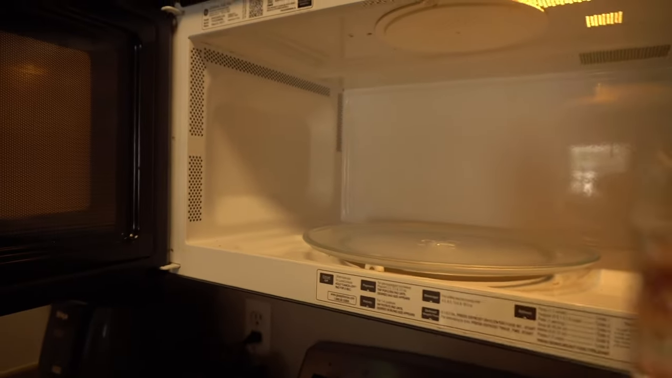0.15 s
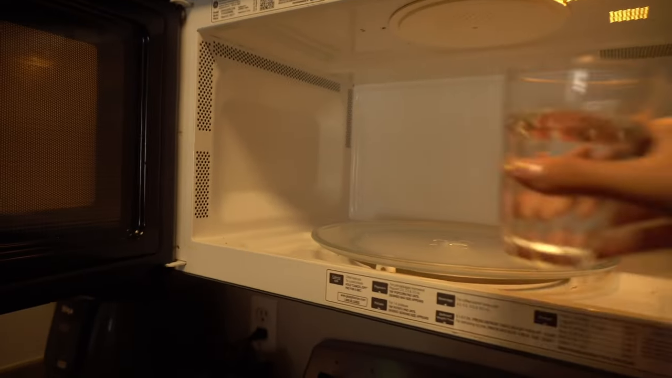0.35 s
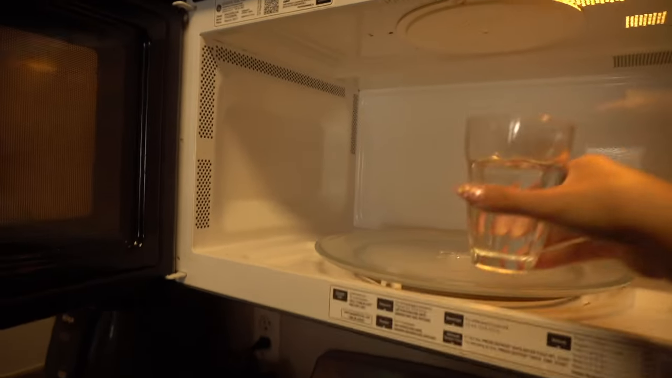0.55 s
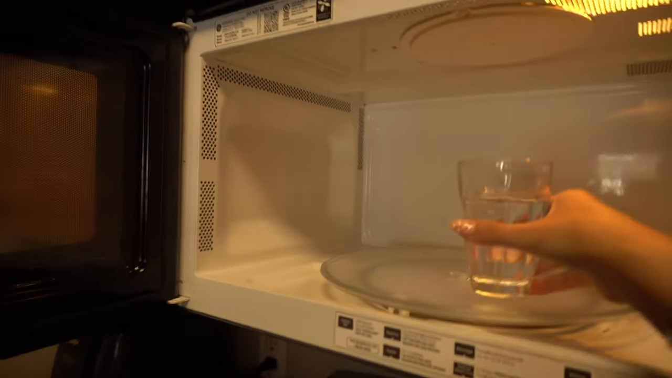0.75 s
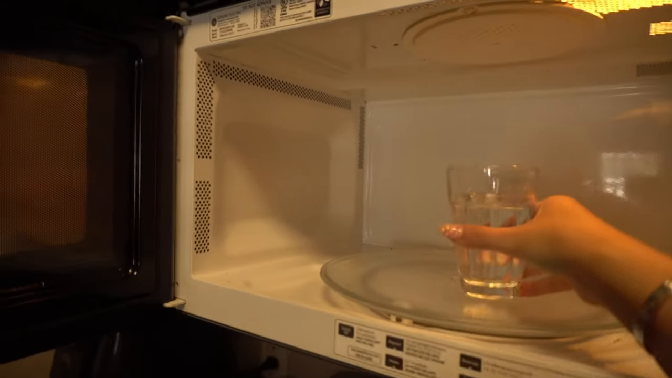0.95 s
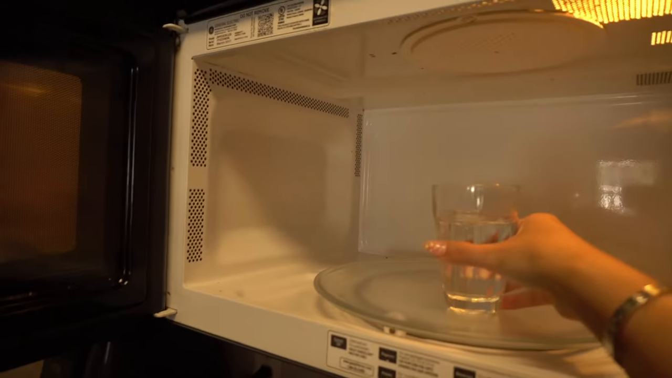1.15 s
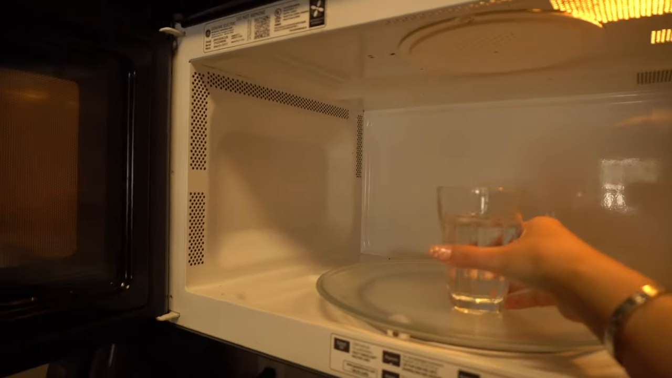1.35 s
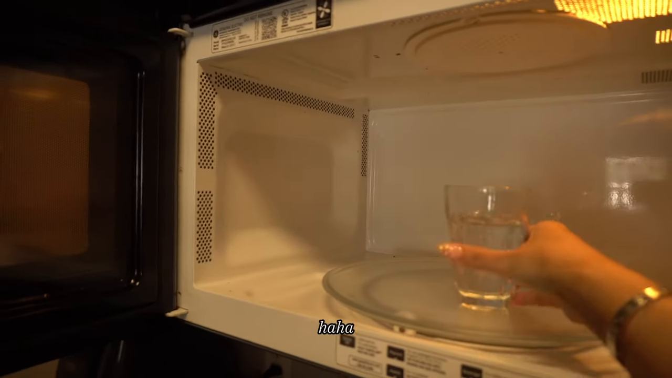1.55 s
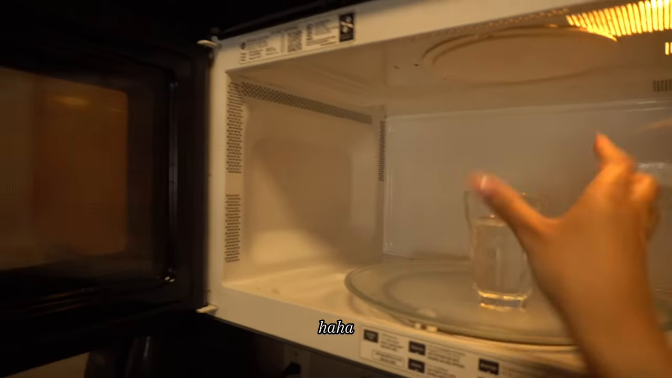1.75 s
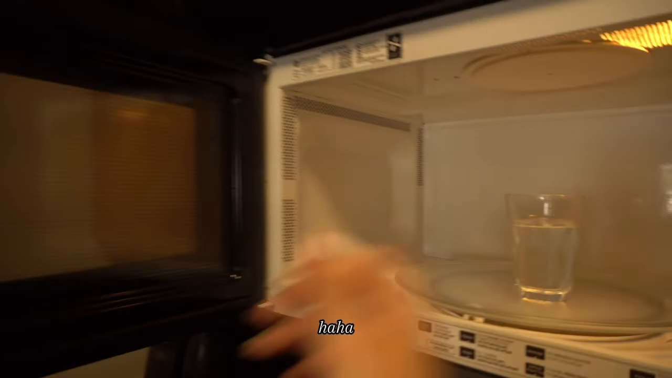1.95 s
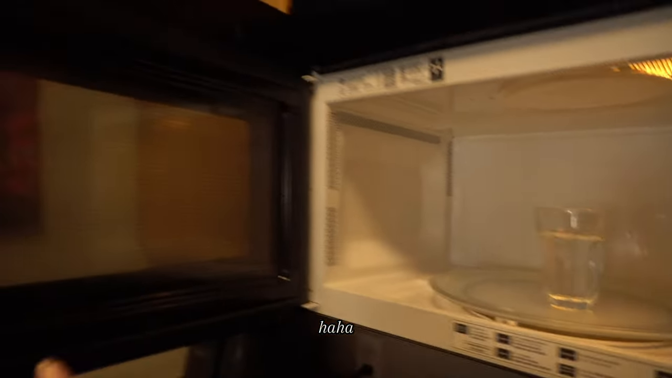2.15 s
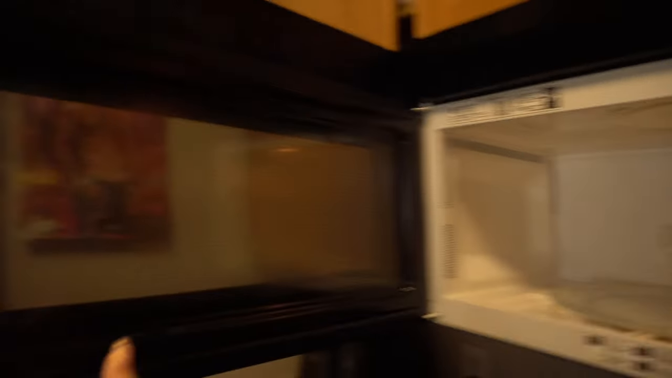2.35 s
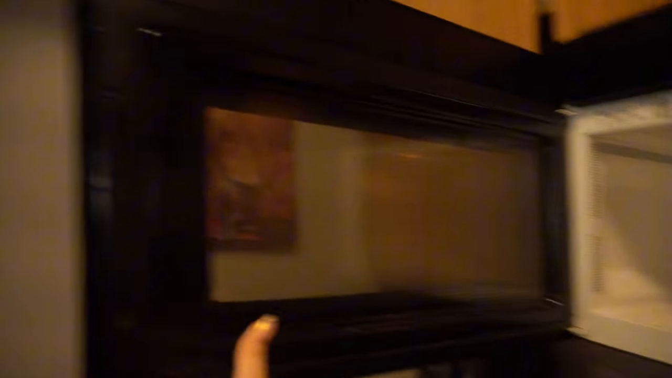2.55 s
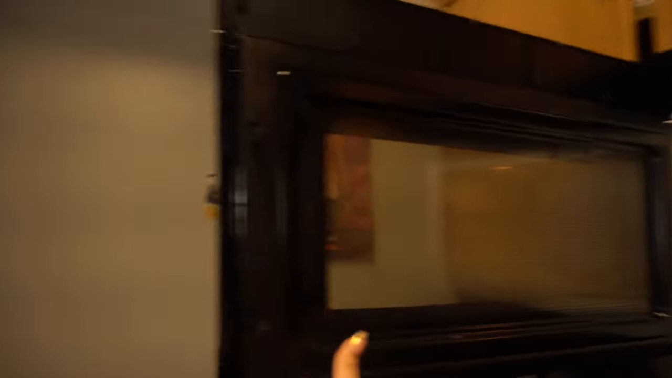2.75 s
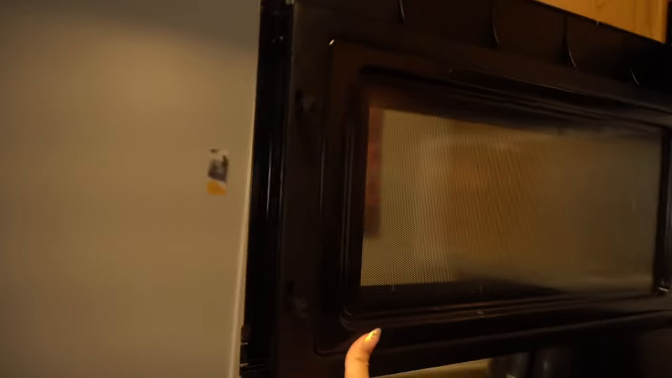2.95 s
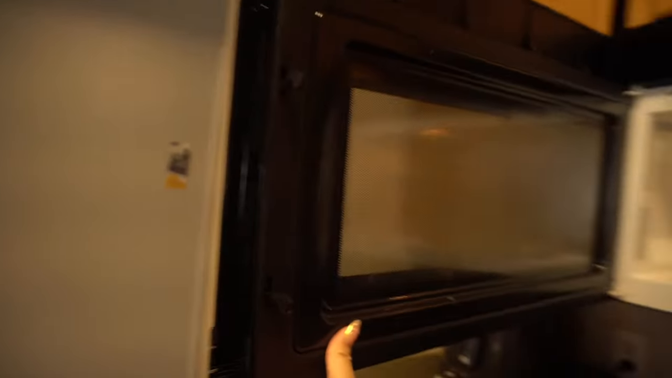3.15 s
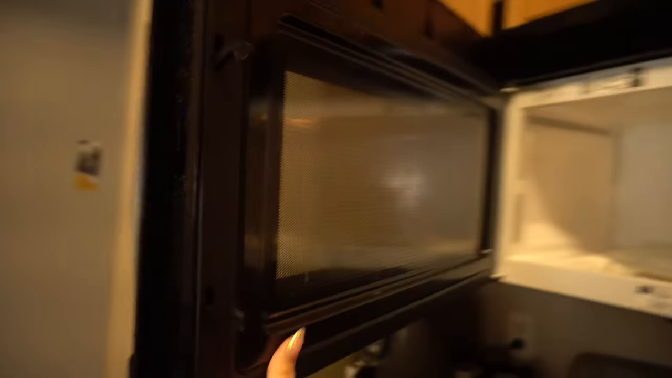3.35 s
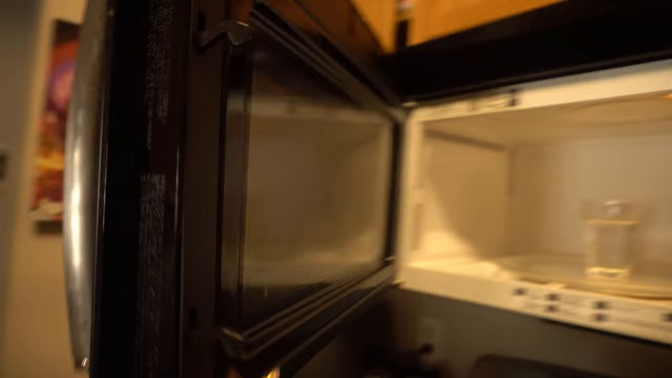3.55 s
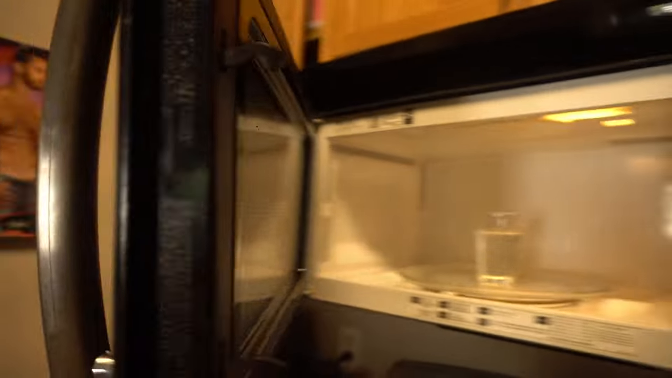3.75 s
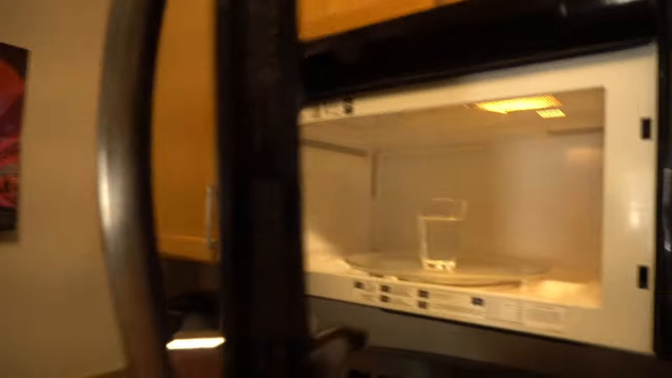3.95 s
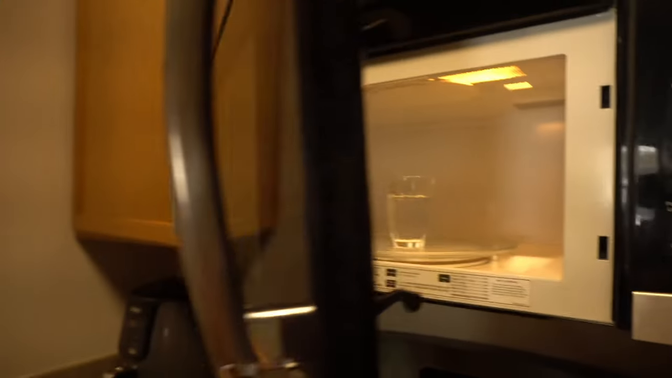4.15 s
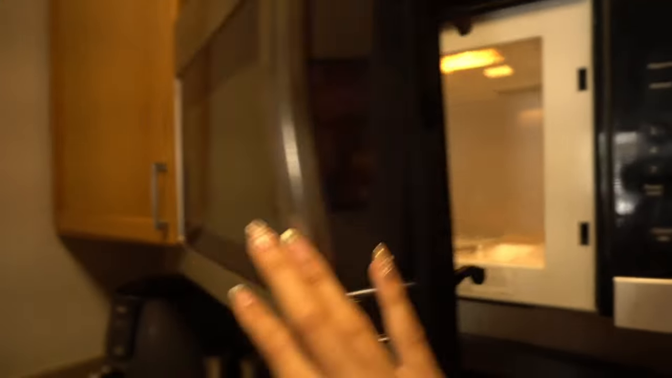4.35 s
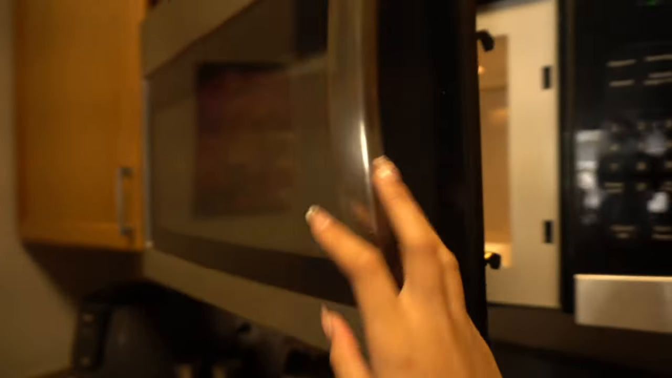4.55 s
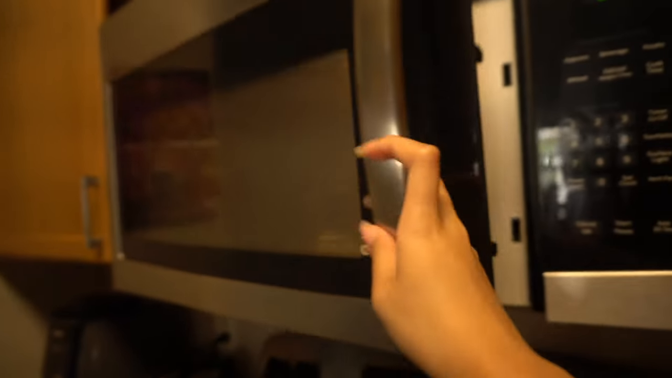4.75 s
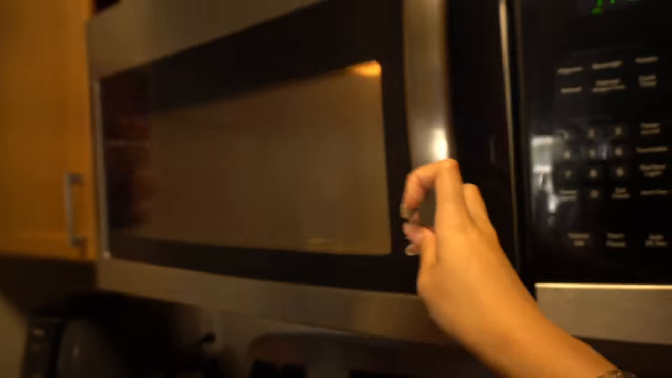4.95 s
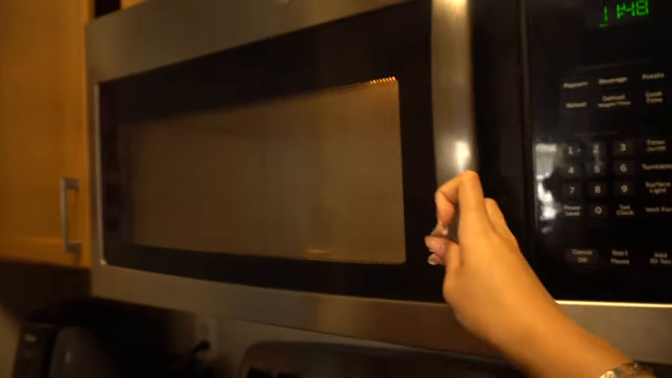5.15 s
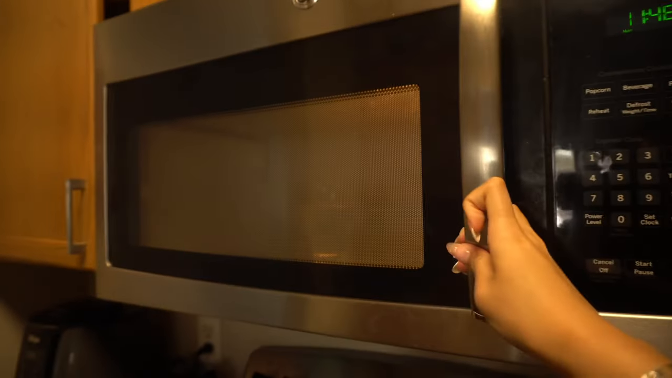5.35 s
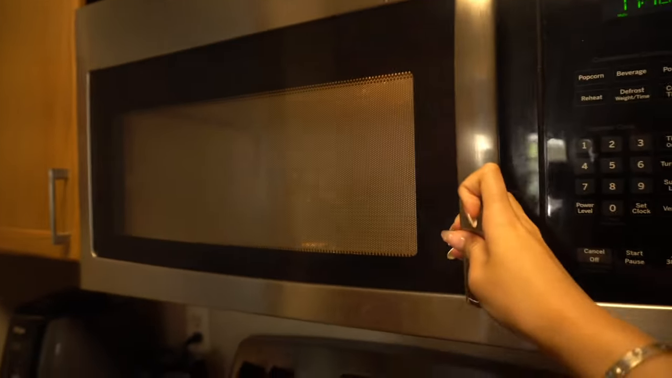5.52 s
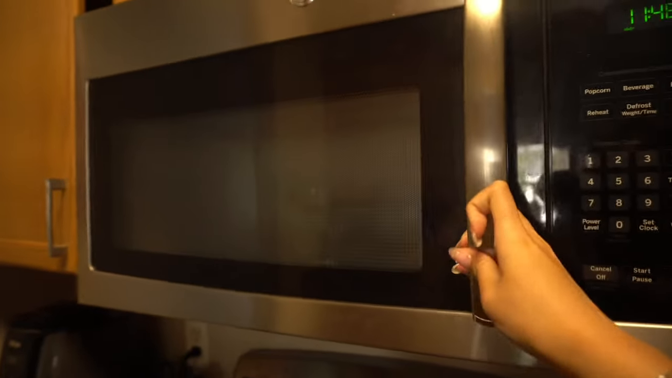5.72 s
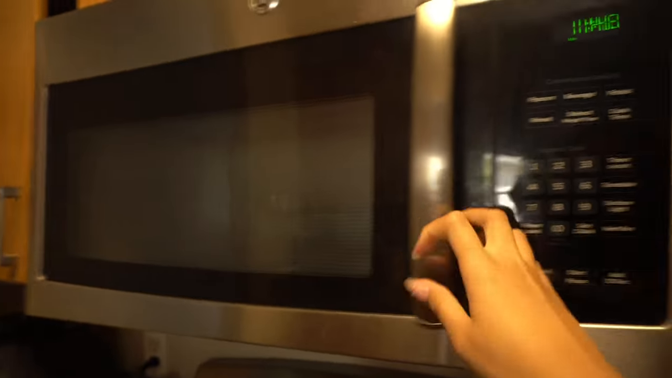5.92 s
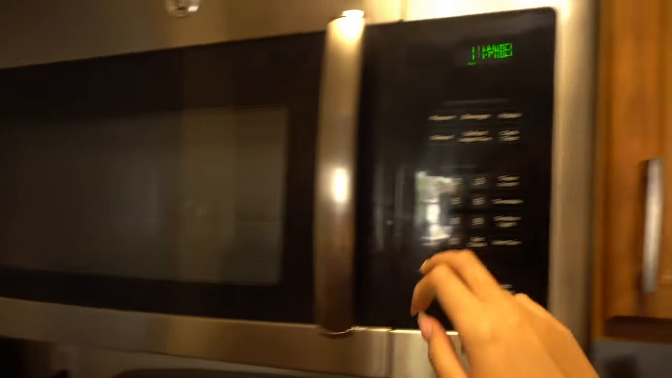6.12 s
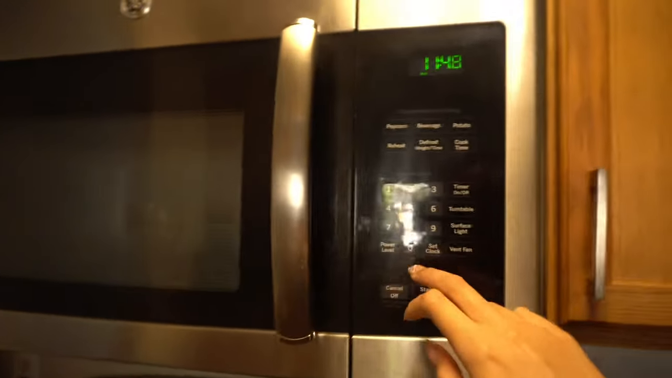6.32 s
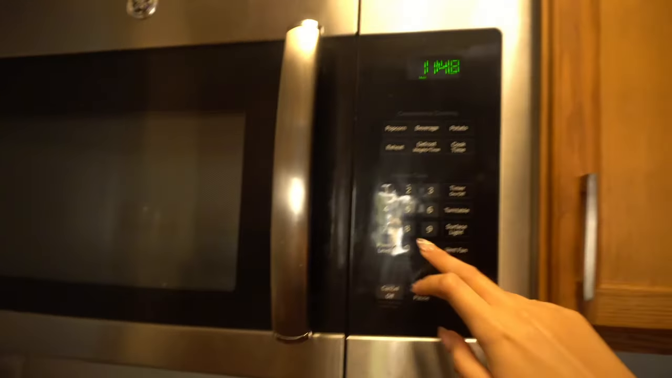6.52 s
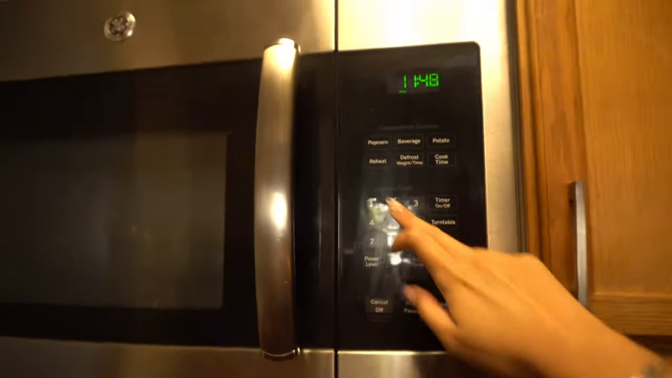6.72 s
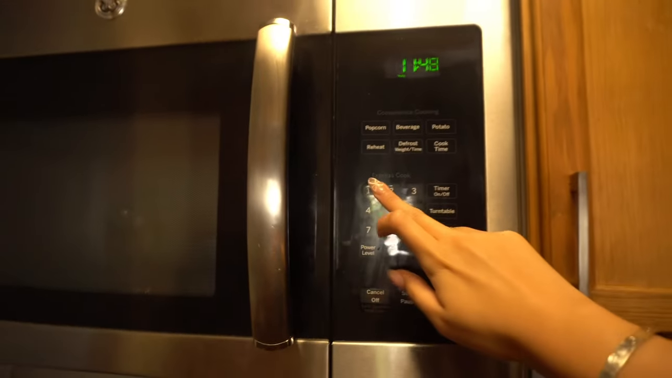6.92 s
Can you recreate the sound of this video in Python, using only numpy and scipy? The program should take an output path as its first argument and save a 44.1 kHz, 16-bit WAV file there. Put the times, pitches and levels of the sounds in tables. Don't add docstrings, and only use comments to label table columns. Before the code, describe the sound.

A double glassy clink with a short ring, dull wobbling thuds beneath it, then light knuckle knocks, fingernail ticks and grainy skin slides on a microwave door. A faint creak as it swings, small latch touches, then a loud, hard, boomy thunk with a fading hum. Finally a tiny sharp nail click. Heard up close, with soft room hum, hiss and short indoor reverberation.

```python
import sys
import numpy as np
from scipy import signal
from scipy.fft import rfft, irfft, next_fast_len
from scipy.io import wavfile
from scipy.ndimage import uniform_filter1d

SR = 44100
rng = np.random.default_rng(int(sys.argv[2]) if len(sys.argv) > 2 else 0)


def wrap_up_sound(samples):
    columns = np.atleast_2d(samples).T
    tamed = np.clip(columns, -1, 1)
    steps = np.round(tamed * 32767).astype(np.int16)
    wavfile.write(sys.argv[1], SR, steps)


def nominal_scale(level):
    x = np.asarray(level, float) / 20
    return 10 ** x


N = 307818


def evened(x):
    return x / np.sqrt(np.mean(x ** 2) + 1e-20)


def read(points, hz):
    f, value = np.transpose(points)
    return np.interp(np.log(hz + 1), np.log(f + 1), value)


def add(mix, start_s, sound):
    part = mix[:, round(start_s * SR):][:, :sound.shape[1]]
    part += sound[:, :part.shape[1]]


def panned(x, db):
    return x * nominal_scale(np.array([db / 2, -db / 2])).reshape(2, -1)


def noise(size, gain, side=None):
    # pitch_hz, side_minus_mid_db
    port_side = [(60, -36.5), (110, -34), (200, -37), (380, -18.5), (700, -10.5), (1290, -6), (2380, -5),
                 (4400, -2.5), (8120, -0.5), (15000, -3.5)]
    hz = np.fft.rfftfreq(size, 1 / SR)
    mid, unlike = rfft(rng.standard_normal((2, size))) * gain(hz)
    unlike = unlike * nominal_scale(read(port_side if side is None else side, hz))
    return evened(irfft(np.array([mid + unlike, mid - unlike]), size))


def resonate(x, hz, width_hz):
    turn = np.exp(2j * np.pi * np.cumsum(hz * np.ones(x.shape[-1])) / SR)
    r = np.exp(-np.pi * width_hz / SR)
    return 2 * (turn * signal.lfilter([1 - r], [1, -r], x / turn)).real


def ring(modes, rise_s, pans_db=0., rough=.0, size=SR):
    hz, db, t60 = np.transpose(modes)[:, :, None]
    t = np.arange(size) / SR
    a, b = uniform_filter1d(rng.standard_normal((2, len(modes), 640)), size=3)
    step = (t * 330).astype(int)
    looseness = rough * (1 - np.exp(-t / .06))
    waver = uniform_filter1d(1 + looseness * (a[:, step] + 1j * b[:, step]), size=130)
    sines = (waver * np.exp(2j * np.pi * hz * t)).imag
    lines = nominal_scale(db - 60 * t / t60) * sines * (1 - np.exp(-t / rise_s))
    return nominal_scale(np.outer([.5, -.5], pans_db * np.ones(len(modes)))) @ lines


def knocks(rows, colour_db):
    out = np.zeros((2, N))
    t = np.arange(2 ** 15) / SR
    for start_s, db, rise, t60, tilt_db in rows:
        def gain(hz):
            octaves = np.log2(np.clip(hz, 60, None) / 700)
            return nominal_scale(colour_db(hz) + tilt_db * octaves)

        swell = np.sin(np.pi / 2 * np.clip(t / rise, 0, 1))
        fade = nominal_scale(db - 60 * np.maximum(t - rise, 0) / t60)
        add(out, start_s, noise(len(t), gain) * swell * fade)
    return out


def floor():
    # pitch_hz, level_db per Hz
    room_colour = [(8.8, -40), (15, -2.5), (54, -4.5), (124, -14.5), (147, -18), (335, -16.5), (377, -21),
                   (677, -26), (831, -24), (1050, -28), (2320, -32), (3110, -32.5), (3390, -35),
                   (15500, -37.5), (16500, -40)]
    # pitch_hz, side_minus_mid_db
    room_side = [(60, -22), (110, -9.5), (200, -6.5), (380, -1), (700, 1), (1290, 2.5), (2380, 1),
                 (4400, -0.5), (8120, -1.5), (15000, -2.5)]
    # pitch_hz, width_hz, level_db
    fridge = [(53, 10, -61.5), (116, 9.8, -66)]
    size, floor_db = next_fast_len(N), -56.5
    drift = nominal_scale(1.52 * evened(uniform_filter1d(rng.standard_normal(size), 3000)))
    rumble = noise(size, lambda hz: nominal_scale(read(room_colour, hz)) * (hz < 400), room_side)
    hiss = noise(size, lambda hz: nominal_scale(read(room_colour, hz)) * (hz >= 400), room_side)
    out = rumble * drift * nominal_scale(floor_db - 3.5) + hiss * nominal_scale(floor_db - 6.5)
    for hz, width, db in fridge:
        out = out + nominal_scale(db) * evened(resonate(rng.standard_normal(size), hz, width))
    return out[:, :N]


def rubs():
    # start_s, level_db, rise_s, brightness_db, left_right_db
    strokes = [(.212, -59, 0.0093, 2.5, -1.5), (3.036, -56, 0.014, 3, -1.5),
               (3.145, -59.5, .015, 2.5, -2.2), (3.214, -49, .008, 3, -1.1), (3.335, -48.5, 0.07, 3.5, -.7),
               (4.588, -54, 0.01, 5, -2), (4.73, -58, 0.027, 8, -2), (5.855, -50.5, 0.0055, 1, -1.1)]
    # start_s, level_db, rise_s, t60_s, brightness_db per octave
    catches = [
        (3.047, -57, 0.0041, .1, -7),
        (3.2205, -43.5, 0.0046, 0.065, -7.5),
    ]
    # pitch_hz, level_db per Hz
    skin_colour = [(290, -9), (500, -6), (640, -13), (880, -7), (960, -12), (1690, -1), (3200, -1.5),
                   (3440, -3.5), (11100, -8), (16000, -13)]
    from_db, hold, t60_s = -18, 0.94, 0.56
    out = knocks(catches, lambda hz: read(skin_colour, hz) - 20 * (hz < 1300))
    t = np.arange(SR // 2) / SR
    for start_s, db, rise, tilt_db, pan_db in strokes:
        dull = noise(len(t), lambda hz: nominal_scale(read(skin_colour, hz)) * (hz < 5000))
        bright = noise(len(t), lambda hz: nominal_scale(read(skin_colour, hz)) * (hz >= 5000))
        grain = nominal_scale(1.3 * evened(uniform_filter1d(rng.standard_normal(len(t)), 120)))
        swell_db = from_db * np.maximum(1 - t / rise, 0)
        fade_db = -60 * np.maximum(t - rise * (1 + hold), 0) / t60_s
        skin = nominal_scale(1.5 - tilt_db) * dull + nominal_scale(-7.0 + tilt_db) * bright
        add(out, start_s, panned(skin * grain * nominal_scale(db + swell_db + fade_db), pan_db))
    return out


def ticks():
    # start_s, peak_db, pitch_hz, t60_s, left_right_db
    taps = [(0.7603, -36, 9600, 0.025, -2), (2.4503, -34.5, 9300, 0.043, 7), (2.4577, -44, 3220, 0.03, 6),
            (2.7315, -36, 7980, .03, 0), (2.7805, -44, 11000, .02, 0), (2.8025, -43, 8000, .03, 3),
            (2.7839, -31, 4050, 0.033, 5), (2.7928, -38, 6000, 0.03, 5), (2.9341, -41, 9200, 0.03, 0),
            (2.9414, -42, 8800, .03, 1), (2.9768, -47, 6000, .03, 2), (2.9485, -28, 5070, 0.028, 0),
            (2.9594, -36.5, 3070, 0.04, 2), (3.2201, -42, 1943, 0.03, -5), (3.7668, -55, 2020, 0.03, -8),
            (3.7812, -33, 9400, 0.041, 3), (3.7997, -36.5, 4120, 0.047, 5), (4.0216, -36, 9260, 0.041, 3.5),
            (4.028, -42.5, 2600, .035, 2.5), (4.593, -30, 5850, 0.04, 0), (4.6212, -44, 2130, 0.03, 0.0),
            (4.7326, -30.5, 6540, 0.035, 0), (5.8677, -38, 9000, 0.04, -4), (5.893, -35, 11500, 0.03, -1),
            (6.5512, -47.5, 3430, 0.031, 1.5)]
    # start_s, peak_db, pitch_hz, t60_s, left_right_db
    key_press = [(6.7782, -44.5, 4980, .02, 1), (6.7827, -30, 8500, .015, 7), (6.7844, -36, 5000, .014, -1),
                 (6.7852, -26, 9650, 0.014, -1), (6.7888, -36.5, 7000, 0.033, 2),
                 (6.7925, -46, 9000, .02, 0), (6.796, -46, 5000, .02, 0), (6.801, -47, 6000, .02, 0),
                 (6.803, -42, 5000, .03, 3), (6.846, -49, 5000, .02, -2), (6.8505, -45, 3600, .03, -3)]
    out = np.zeros((2, N))
    t = np.arange(4096) / SR
    for start_s, db, hz, t60, pan_db in np.vstack([taps, key_press]):
        def gain(f):
            hump = 1 / (1 + (np.log2((f + 1) / hz) / 3.0) ** 4)
            return hump * f ** 2 / (f ** 2 + 700. ** 2)

        crack = np.sin(2 * np.pi * hz * t) * np.exp(-t * hz / 1.3) * (1 - np.exp(-t * hz / .4))
        fade = nominal_scale(-4.5 - 60 * t / .007) + nominal_scale(-21.5 - 60 * t / t60)
        tick = nominal_scale(0.5) * crack + noise(len(t), gain) * fade
        add(out, start_s, panned(tick * nominal_scale(db), pan_db))
    return out


def plate_and_glass():
    # pitch_hz, first_blow_db, second_blow_db, t60_s, left_right_db
    plate_modes = [(1110, -31, -33, 0.62, -2.5), (1133, -38.5, -32, 0.87, -3),
                   (1201, -17.5, -21, 0.62, -4.5), (1213, -26.5, -21, 0.45, -4), (1264, -36, -25, 0.31, -1),
                   (1510, -39.5, -43, 0.64, -5), (1722, -38.5, -46.5, 0.31, 0), (1910, -43, -29, 0.27, -5),
                   (2070, -23.5, -28, 0.6, -7.5), (2088, -29, -14.5, 0.24, -7), (2226, -43, -31, 0.21, -5),
                   (3068, -35.5, -36, 0.59, -9.5), (3080, -27, -29.5, 0.32, -5.5),
                   (3104, -29.5, -29.5, 0.46, -3.5)]
    # pitch_hz, first_blow_db, t60_s, left_right_db
    glass_modes = [(3490, -39.5, 0.51, -3), (4250, -39, .2, -.6), (4934, -42.5, .49, -3.5),
                   (5044, -41.5, .62, -3.5), (5631, -46, .6, -3.5), (6434, -44.5, .58, 1.4),
                   (6785, -48, .27, -.6), (8075, -49, .44, -3), (8690, -57.5, .51, 3.5),
                   (9900, -56, .51, 2.1), (10600, -62, 0.55, 2.1), (11820, -61.5, .51, -1.5),
                   (13400, -61, 0.5, 0), (14980, -60, .45, -1.5),
                   (7047, -54, .6, -2), (7200, -58, .5, -2), (9780, -60, .5, 0), (11080, -63, .6, 0),
                 (12750, -62, .6, 0), (13520, -64, .6, 0), (13900, -66, .7, 0)]
    blows = [
        1.158,
        1.2545,
    ]
    hz, db, t60, pans = np.array(glass_modes).T
    glass = np.column_stack([hz, db, db - 4.5, t60, pans])
    hz, first_db, second_db, t60, pans = np.vstack([plate_modes, glass]).T
    since = np.arange(N) / SR - blows[1]
    out = np.zeros((2, N))
    add(out, blows[0], ring(np.transpose([hz, first_db, t60]), 0.0019, pans, rough=.35, size=30000))
    out *= nominal_scale(-7. * np.clip(since / .01, 0, 1))
    add(out, blows[1], ring(np.transpose([hz, second_db, t60 * 1.1]), 0.0034, pans, rough=.6, size=30000))
    return out * nominal_scale(-7. * np.clip((since - .022) / .03, 0, 1))


def box_db(hz):
    # pitch_hz, width_hz, level_db
    box_modes = [(75, 20, -9), (130, 30, -12), (169, 48, -6), (337.7, 81, -0.5), (460, 80, -5.5),
                 (558.7, 40, -6), (688, 58, 1), (834.5, 61, -0.5), (1013.5, 76, -4.5), (1350, 150, -8),
                 (1714, 170, -14), (2350, 171.5, -14), (2650, 200, -18), (3265, 700, -16),
                 (4400, 470, -26.5)]
    power = nominal_scale(-140.)
    for f, width, db in box_modes:
        power = power + nominal_scale(2 * db) / (1 + (2 * (hz - f) / width) ** 2) ** 2
    return 10 * np.log10(power)


def rocking():
    # start_s, level_db, rise_s, t60_s, brightness_db per octave
    thuds = [(1.158, -28, 0.0094, 0.41, 1.5), (1.196, -29.5, 0.0039, 0.21, 3.5),
             (1.224, -30, 0.0097, 0.16, -2.5), (1.255, -24.5, 0.0052, 0.31, 0),
             (1.385, -31, 0.021, 0.18, -3), (1.458, -45.5, 0.0067, 0.39, -3.5),
             (1.573, -45.5, .018, 0.14, -1.3), (1.731, -54, 0.012, 0.11, -2.5)]
    # start_s, level_db
    drums = [
        (1.268, -29),
        (1.388, -29),
        (1.575, -50),
    ]
    # pitch_hz, level_db, t60_s
    oven_floor = [(175, -16, .2), (345, -4, .3), (470, -9, .2), (688, 0, .22), (845, -4, .22)]
    out = panned(knocks(thuds, box_db), -1.7)
    for start_s, db in drums:
        add(out, start_s, nominal_scale(db) * ring(oven_floor, .012, -1.5, rough=.6, size=12000))
    return out


def kitchen(x):
    # pitch_hz, t60_s
    room_decay = [(100, 0.77), (500, 0.67), (2000, 0.61), (5000, 0.62), (12000, 0.36)]
    hz, t, z = signal.stft(noise(SR, lambda f: 1. + 0 * f), SR, nperseg=256)
    fade = nominal_scale(-60 * t / read(room_decay, hz)[:, None])
    tail = signal.istft(z * fade, SR, nperseg=256)[1]
    tail *= np.clip(np.arange(tail.shape[1]) / SR / 0.0082, 0, 1)
    return signal.fftconvolve(x.mean(0)[None], tail / np.linalg.norm(tail[0]), axes=1)[:, :N]


def hand_on_door():
    # start_s, level_db, rise_s, t60_s, brightness_db per octave
    grabs = [(2.6, -50.5, 0.032, 0.23, -3), (2.635, -38.5, 0.0063, 0.12, 1), (2.653, -37, 0.0064, 0.1, 0.5),
             (2.674, -41, 0.0043, 0.15, -3.5), (2.731, -41, 0.003, 0.12, 4.5),
             (2.743, -40, 0.003, 0.14, 5.5), (5.524, -39, .016, 0.14, -6)]
    # pitch_hz, level_db per Hz
    grab_colour = [(59, -35), (100, 5), (197, -14), (315, 3), (513, 2), (583, -2), (1010, -2),
                   (1420, -16.5), (1910, -16.5), (4380, -22.5), (6990, -36), (11200, -35.5), (16000, -48)]
    # start_s, level_db, t60_s
    knuckles = [(2.594, -57, .08), (2.652, -35, .09), (2.734, -35.5, .08), (2.748, -41.5, .1),
                (2.865, -54, .1)]
    # pitch_hz, level_db, t60_s
    sway = [(78, -41, 0.31), (100.3, -41, 0.26), (292, -46, 0.12)]
    out = knocks(grabs, lambda hz: read(grab_colour, hz))
    for start_s, db, t60 in knuckles:
        add(out, start_s, ring([(951, db, t60)], 0.002, rough=.5, size=9000))
    add(out, 4.805, ring(sway, 0.0066))
    return out


def hinge():
    # pitch_hz, level_db, t60_s
    pin_chirp = [(844, -53.5, .12), (640, -61, .2)]
    # start_s, squeak_db, leaf_hum_db
    jerk_rows = [(4.592, -57, -53), (4.62, -56, -58), (4.685, -59, -52), (4.725, -59, -56.5),
                 (4.78, -65, -60)]
    jerk_rise_s, jerk_t60_s, slips_per_s = 0.0041, 0.21, 900
    t = np.arange(SR // 2) / SR
    start_s, squeak_db, hum_db = np.transpose(jerk_rows)[:, :, None]
    since = np.maximum(t + start_s[0] - start_s, 0)
    jerks = (1 - np.exp(-since / jerk_rise_s)) * nominal_scale(-60 * since / jerk_t60_s)
    slips = (rng.random(len(t)) < slips_per_s / SR) * rng.standard_normal(len(t))
    pitch_hz = 1287 + 120 * np.exp(-t / .045)
    squeak = evened(resonate(resonate(slips, pitch_hz, 150.), pitch_hz, 300.))
    hum = evened(resonate(resonate(slips, 314.0, 50.), 314.0, 200.))
    creak = squeak * (nominal_scale(squeak_db) * jerks).sum(0) + hum * (nominal_scale(hum_db) * jerks).sum(0)
    out = np.zeros((2, N))
    add(out, 4.332, ring(pin_chirp, .008, rough=.6))
    add(out, jerk_rows[0][0], panned(creak, .1))
    return out


def latch_hooks():
    # start_s, level_db, rise_s, t60_s, brightness_db per octave
    touches = [(5.302, -37.5, 0.0022, .16, 2), (5.325, -36, 0.015, 0.27, -.5),
               (4.9, -55, 0.0085, 0.35, 1.5)]
    # pitch_hz, level_db per Hz
    touch_colour = [(24, -39), (40, -3), (140, -1), (337, -13.5), (600, -16.5), (680, -19), (965, -22.5),
                    (1680, -26.5), (3380, -24.5), (3650, -23), (4680, -35.5), (5870, -38), (16000, -56)]
    # pitch_hz, level_db, t60_s
    chink = [(2150, -44, .05), (2600, -48, .05), (3700, -53, .25), (3300, -56.5, .2)]
    # pitch_hz, level_db, t60_s
    spring = [(3620, -60, .35), (494, -53, 0.7), (297, -46, 0.55), (81, -33.5, 0.33), (143, -41, 0.32)]
    # start_s, level_db, rise_s, t60_s, brightness_db per octave
    snaps = [(5.559, -19, 0.0016, 0.16, 0.5)]
    # pitch_hz, level_db per Hz
    hook_colour = [(59, -50), (100, -33), (289, -5.5), (442, -9), (691, -1), (1360, -18.5), (2040, -9),
                   (2580, -21.5), (3780, -11), (4980, -27.5), (5650, -16.5), (6990, -31.5), (7770, -23.5),
                   (12700, -37), (16000, -65)]
    # pitch_hz, level_db, t60_s
    hook_modes = [(95, -30, .12), (305.4, -20, 0.12), (596, -22.5, 0.11), (720, -23, 0.1),
                  (1995, -21, 0.081), (2850, -23, 0.042), (3908, -38, .09), (5660, -36, .11),
                  (7740, -50, .1), (9050, -40, 0.082), (11000, -58, .075)]
    out = knocks(touches, lambda hz: read(touch_colour, hz))
    out += knocks(snaps, lambda hz: read(hook_colour, hz))
    add(out, 5.3025, ring(chink, .0006, rough=1.2, size=9000))
    add(out, 5.303, ring(spring, 0.014, rough=1.2))
    add(out, 5.56, ring(hook_modes, 0.00059, rough=0.65))
    return out


def door_shuts():
    # start_s, level_db, rise_s, t60_s, brightness_db per octave
    cracks = [
        (5.601, -15.5, 0.0023, 0.13, 0),
        (5.617, -20.5, 0.00139, 0.06, -0.5),
    ]
    # pitch_hz, level_db per Hz
    crack_colour = [(240, -43), (400, -15.5), (572, -2.5), (806, -13.5), (1150, -7), (1900, -14),
                    (2080, -10), (3220, -14), (4830, -18), (5300, -22), (10000, -18.5), (15500, -36),
                    (16500, -48)]
    # start_s, level_db, rise_s, t60_s, brightness_db per octave
    booms = [(5.606, -16.5, 0.021, 0.58, -0.59)]
    # pitch_hz, level_db per Hz
    boom_colour = [(15, -50), (28, -13.5), (48, -19), (80, -12), (149, -8.5), (229, -11.5), (277, -5.5),
                   (335, -12), (384, -7), (489, -11), (754, -15.5), (911, -14), (1290, -21), (3080, -21.5),
                   (16000, -47)]
    # pitch_hz, level_db, t60_s
    panels = [(104, -28, 0.35), (252.4, -45, 1.5), (293.5, -21.5, 0.5), (310.6, -37.5, 1.3), (267, -29, .3),
              (372.7, -28.5, 0.49), (602, -29.5, 0.38), (424, -40, 1.18), (494, -27, 0.46),
              (693, -34.5, 0.69), (778, -41, 0.65)]
    # pitch_hz, level_db, t60_s
    air_thump = [(81.4, -13.5, .26), (110, -18, .22), (155.8, -20, 0.34)]
    # pitch_hz, level_db, t60_s
    rebound = [(140.6, -18, 0.14), (273, -21, .15)]
    out = knocks(cracks, lambda hz: read(crack_colour, hz))
    out += knocks(booms, lambda hz: read(boom_colour, hz))
    add(out, 5.603, ring(panels, 0.0061, rough=0.66))
    add(out, 5.612, ring(air_thump, 0.0076, rough=.15))
    add(out, 5.646, ring(rebound, 0.0026, rough=.2, size=9000))
    return out


def rack_ring():
    # pitch_hz, level_db, t60_s
    beating_pair = [(372, -47.5, 3.9), (381.85, -43.5, 3.9)]
    return ring(beating_pair, .03, size=3 * SR // 2)


def scene():
    room, skin, nails = floor(), rubs(), ticks()
    plate = plate_and_glass() + rocking()
    leaf = hand_on_door() + hinge() + latch_hooks() + door_shuts()
    wet = nominal_scale(-5.5) * leaf + nominal_scale(-9.5) * skin + nominal_scale(-18.5) * nails
    out = plate + leaf + nails + skin + room
    out += kitchen(wet) + panned(kitchen(nominal_scale(-7.5) * plate), -2.5)
    add(out, 5.643, rack_ring())
    return out


def roll_off(x):
    return signal.sosfilt(signal.butter(12, 16990, fs=SR, output="sos"), x)


def record(dry):
    edge = signal.firwin(511, 16080, window=("kaiser", 9), fs=SR)
    return roll_off(signal.oaconvolve(dry, edge[None], "same"))


dry = scene()
out = record(dry)
wrap_up_sound(out)
```